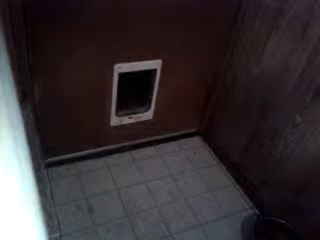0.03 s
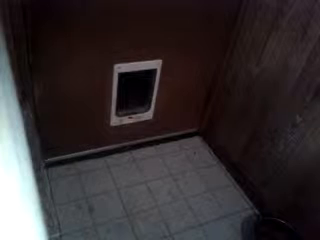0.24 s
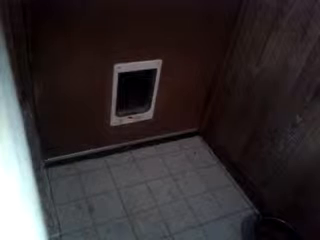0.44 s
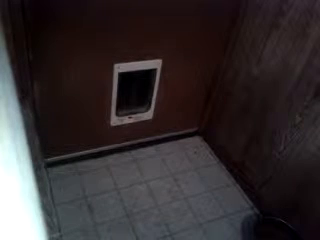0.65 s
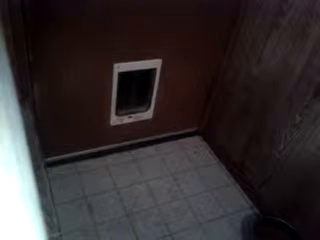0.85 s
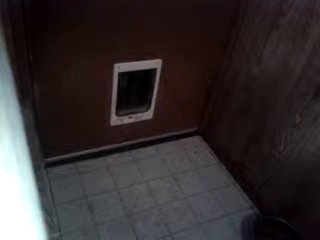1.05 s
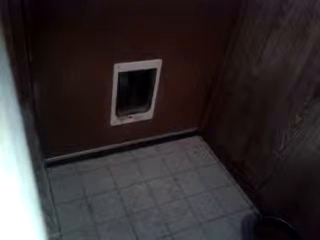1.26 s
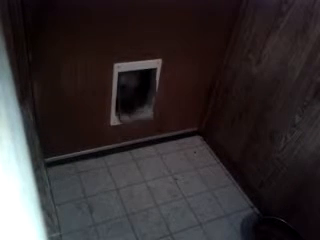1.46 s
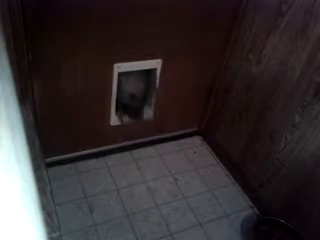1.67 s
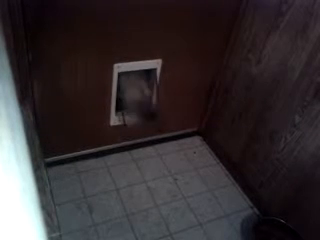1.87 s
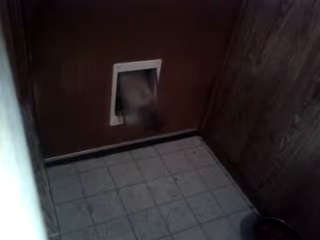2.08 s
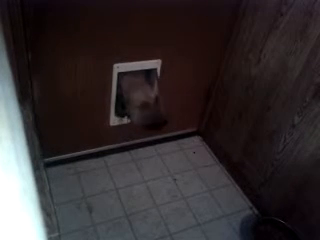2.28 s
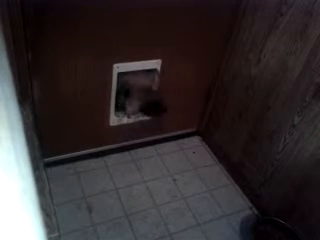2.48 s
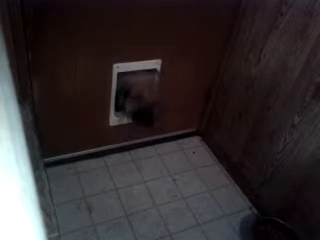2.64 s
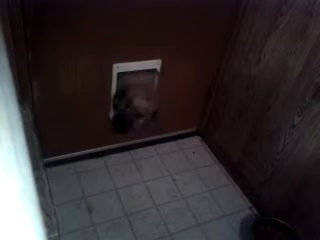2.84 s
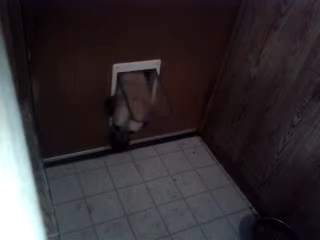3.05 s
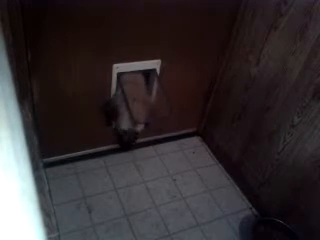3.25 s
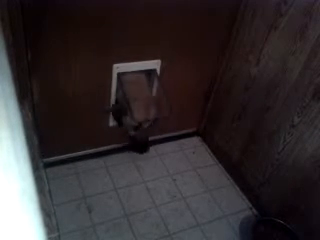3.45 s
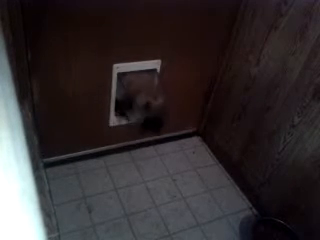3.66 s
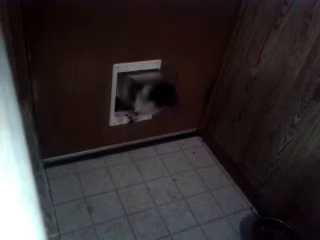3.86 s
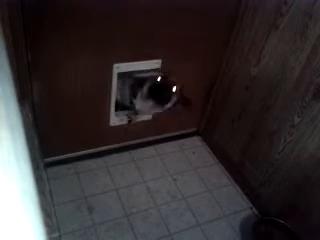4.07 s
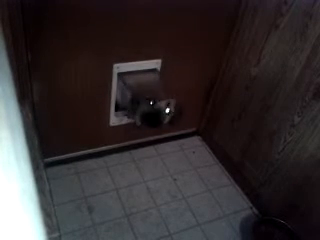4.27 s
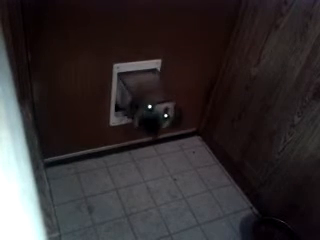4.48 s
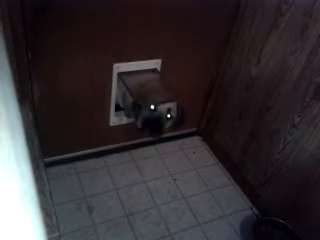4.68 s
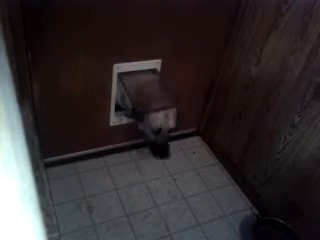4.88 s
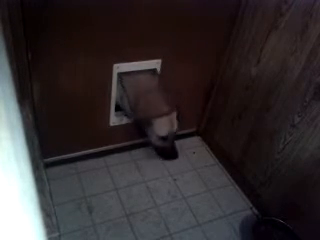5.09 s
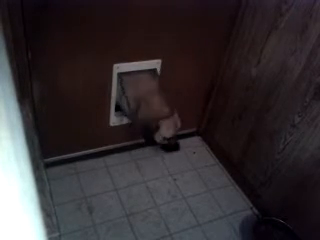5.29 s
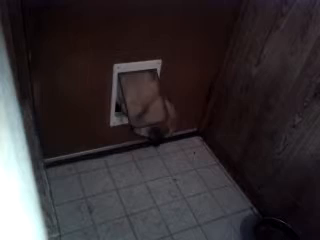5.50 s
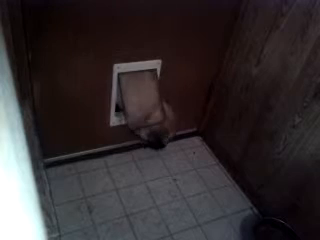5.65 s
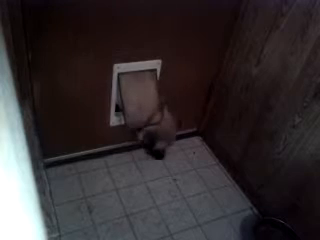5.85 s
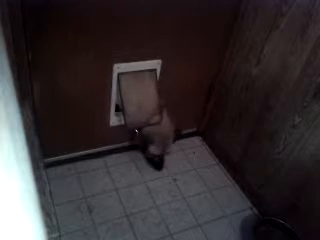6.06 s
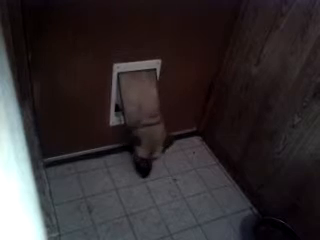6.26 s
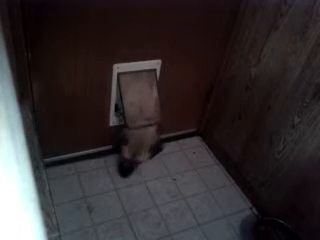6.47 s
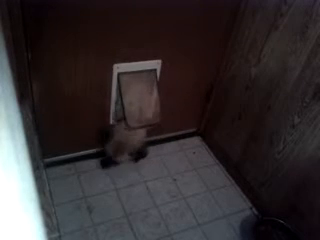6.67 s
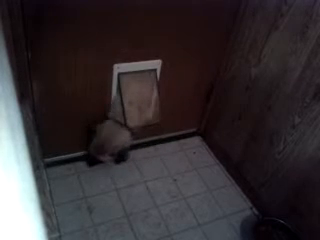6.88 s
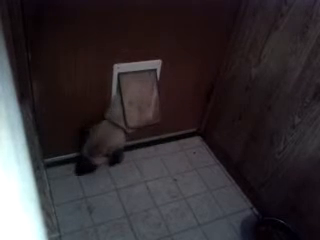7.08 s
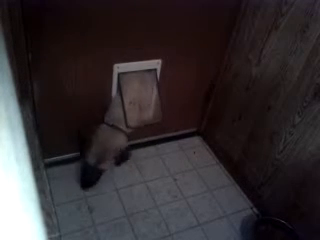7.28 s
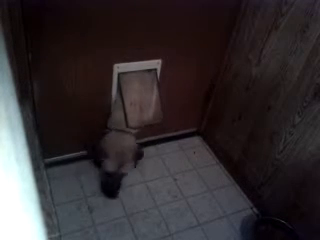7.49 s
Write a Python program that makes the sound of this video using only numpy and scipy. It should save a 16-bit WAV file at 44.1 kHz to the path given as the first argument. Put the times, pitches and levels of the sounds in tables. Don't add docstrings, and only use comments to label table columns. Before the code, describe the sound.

A quiet small tiled room: faint low fridge hum, floor rumble and steady microphone hiss, nothing else until a light rub at about 1.3 s. Around 1.5 s a dog pushes a pet flap, giving a quick double knock and rattle on a hollow wooden door. Another cluster of dull thumps comes at 1.9-2.2 s, with a tiny tag chink. From 2.55 to 3.5 s it is dense: heavy boomy knocks, flap clacks, grainy body rubbing. More bumps follow at 3.8 s, a bright little chink at 4.0, and the hardest thump near 4.25. Lesser knocks continue at 4.6-5.3 s, then a thud at 5.7 and a flap slap at 5.9. Sparse scuffs, faint chinks and a bump around 6.9 s lead to a weak final knock near 7.5. Short hard reverberation, phone about two metres away, muffled top end.

```python
import sys
import numpy as np
from scipy import signal
from scipy.fft import rfft, irfft
from scipy.io import wavfile
from scipy.ndimage import uniform_filter1d

SR = 44100
rng = np.random.default_rng(int(sys.argv[2]) if len(sys.argv) > 2 else 0)


def dump_mix(stems):
    frames = np.atleast_2d(stems).T
    limited = np.clip(frames, -1, 1)
    pcm = np.round(limited * 32767).astype(np.int16)
    wavfile.write(sys.argv[1], SR, pcm)


def convert_level_to_amplitude(level_db):
    exponent = np.asarray(level_db, float) / 20
    return 10 ** exponent


N = 332204
T = np.arange(N) / SR


def level(x, db):
    return x * convert_level_to_amplitude(db) / np.sqrt(np.mean(x ** 2))


def band(x, lo_hz, hi_hz, order=2):
    edges_hz = [lo_hz, min(hi_hz, 0.45 * SR)]
    return signal.sosfilt(signal.butter(order, edges_hz, "bandpass", fs=SR, output="sos"), x)


def low(x, top_hz, order):
    return signal.sosfilt(signal.cheby2(order, 70, top_hz, fs=SR, output="sos"), x)


def log_curve(hz, table):
    table_hz, value = np.transpose(table)
    return np.interp(np.log(hz), np.log(table_hz), value)


def walk(rate):
    hold = int(SR / rate)
    steps = np.repeat(rng.standard_normal(N // hold + 1), hold)
    return 1.6 * uniform_filter1d(uniform_filter1d(steps, hold), hold)[:N]


def grit(shape, spread_db):
    size = np.minimum(rng.exponential(size=shape), 4)
    return rng.standard_normal(shape) * convert_level_to_amplitude(spread_db * size)


def ring(modes, t):
    out = 0
    for k, (hz, db, t60) in enumerate(modes):
        out = out + (-1) ** k * convert_level_to_amplitude(db - 60 * t / t60) * np.sin(2 * np.pi * hz * t)
    return out


def place(times, rows):
    out = np.zeros(N + rows.shape[1])
    for s, row in zip(times, rows):
        start = int(s * SR)
        out[start:start + len(row)] += row
    return out[:N]


# (frequency [Hz], density [dB per Hz])
AIR_COLOUR = [(20, -5.5), (40, 0.5), (75, -5), (150, -11), (250, -11), (450, -17), (800, -21),
              (1450, -27.5), (2000, -23.5), (2750, -29.5), (6400, -32), (7400, -34.5)]


def air():
    hz = np.maximum(np.fft.rfftfreq(N, 1 / SR), 1)
    spectrum = rfft(rng.standard_normal(N)) * convert_level_to_amplitude(log_curve(hz, AIR_COLOUR))
    return level(irfft(spectrum, N), -58)


# (multiple of the base note [1], level [dB])
HUM_HARMONICS = [(1, -60.5), (2, -69), (3, -77), (4, -63), (5, -79), (6, -78), (7, -74.5), (10, -79.5)]
# (time [s], level [dB])
FLOOR_RUMBLE = [(0.0, -50), (0.04, -51), (0.4, -54.5), (2.2, -48), (2.35, -63), (3.0, -45), (3.06, -64),
                (3.29, -49.5), (3.77, -54.5), (3.92, -47.5), (4.17, -56), (4.4, -44.5), (4.7, -54),
                (5.51, -53.5), (5.64, -44.5), (5.73, -57.5), (7.42, -53), (7.53, -44)]


def fridge():
    hum_hz = 59.07 * (1 + 0.0023 * walk(2.6))
    turn = 2 * np.pi * np.cumsum(hum_hz) / SR
    hum = 0
    for k, db in HUM_HARMONICS:
        hum = hum + np.sqrt(2) * convert_level_to_amplitude(db + 2.0 * walk(9.3)) * np.sin(k * turn + k * k)
    s, db = np.transpose(FLOOR_RUMBLE)
    noise = rng.standard_normal((2, N))
    rumble = level(band(noise[0], 47.5, 65.6), -1.2) + level(band(noise[1], 33, 34), -12.0)
    return hum + rumble * convert_level_to_amplitude(np.interp(T, s, db))


# (time [s], chink level [dB], upper mode relative level [dB])
TAG_CHINKS = [(2.2702, -55, -21), (2.597, -54, -11), (2.9752, -54, -8), (3.041, -61.5, -4),
              (4.024, -47, -0.5), (4.0574, -65, -22), (4.0941, -68, -23), (4.506, -68, -8),
              (5.348, -55.5, -5), (5.849, -62.5, -23), (6.476, -56, -31), (7.1227, -56, -15)]
# (frequency [Hz], level [dB], t60 [s])
TAG_MODES = [(6330, 1.5, 0.021), (7180, 3, 0.051), (5890, -12.5, 0.067), (4130, -11.5, 0.013)]


def tag():
    s, db, upper_db = np.transpose(TAG_CHINKS)
    t = T[:SR // 5]
    strikes = rng.standard_normal((len(s), len(t))) * np.exp(-t / 0.008)
    out = 0
    for k, mode in enumerate(TAG_MODES):
        part = signal.fftconvolve(strikes, ring([mode], t)[None], axes=1)[:, :len(t)]
        part = part / np.abs(part).max(axis=1, keepdims=True) * convert_level_to_amplitude(mode[1])
        chink_db = db + (upper_db if k == 1 else 0) - 2.0
        out = out + place(s - 0.001, part * convert_level_to_amplitude(chink_db)[:, None])
    return out


# (time [s], level [dB])
LEAF_JOLTS = [(1.474, -39), (2.099, -42.5), (2.705, -31.5), (2.809, -30.5), (2.961, -47), (3.234, -31),
              (3.767, -45), (4.261, -30.5), (4.608, -48), (4.802, -34.5), (4.99, -40), (5.309, -42.5),
              (5.75, -57), (6.18, -57), (6.928, -57), (7.047, -58)]
# (frequency [Hz], level [dB], t60 [s])
LEAF_MODES = [(151.9, -0.5, 0.32), (183.6, -11, 0.29), (150.2, -7.5, 1.4)]


def leaf():
    s, db = np.transpose(LEAF_JOLTS)
    t = T[:SR]
    push_s = 0.0093
    detune = 1 + 0.01 * rng.standard_normal((len(s), 1))
    swell = (1 - np.exp(-t / push_s)) * (1 - t / t[-1])
    return place(s - 0.004, convert_level_to_amplitude(db - 4.5)[:, None] * swell * ring(LEAF_MODES, t * detune))


# (frequency [Hz], level [dB], t60 [s])
DOOR_MODES = [(155.4, 2, 0.13), (183, -9, 0.13), (223.2, -2.5, 0.095), (248.3, -8, 0.099),
              (298.3, -8, 0.12), (352.4, -7.5, 0.17), (450, -2.5, 0.08), (488.4, -0.5, 0.12),
              (575.5, -1.5, 0.065), (609, -3.5, 0.051), (719.4, -12, 0.18), (755.5, -14, 0.16),
              (1000, -7.5, 0.078), (1094, -4.5, 0.071), (1421, -12.5, 0.11), (1696, -17.5, 0.049),
              (1980, -19, 0.045), (2620, -16, 0.058), (3560, -16, .04)]


def door(force, modes_db, spots=1):
    t = T[:SR // 8]
    chance = spots * rng.standard_normal((len(force), len(DOOR_MODES), 2, 1))
    body = 0
    for k, (hz, db, t60) in enumerate(DOOR_MODES):
        spot_hz = hz * (1 + 0.023 * chance[:, k, 0])
        spot_db = db + 4.06 * chance[:, k, 1]
        body = body + (-1) ** k * ring([(spot_hz, spot_db, t60)], t)
    soft_hz = 1510
    force = signal.lfilter([1], [1, -np.exp(-2 * np.pi * soft_hz / SR)], force)
    ringing = signal.fftconvolve(force, body, axes=1)[:, :force.shape[-1]]
    return force + convert_level_to_amplitude(modes_db) * ringing


# (time [s], lean of the body level [dB], slide of fur and flap level [dB])
BODY_RUB = [(1.3, -67, -69.5), (1.59, -46, -57.5), (1.96, -69, -71), (2.11, -49, -53), (2.32, -69, -63),
            (2.58, -48, -53.5), (2.79, -41, -51), (3.54, -54, -52.5), (4.51, -48.5, -65.5),
            (4.65, -56, -71), (5.2, -51, -64), (5.6, -61.5, -64), (5.9, -50, -58), (6.09, -56, -69),
            (6.7, -54, -61.5), (7.01, -50.5, -59.5), (7.25, -55.5, -66.5), (7.53, -55, -63)]


def rub():
    s, lean_db, drag_db = np.transpose(BODY_RUB)
    friction = door(grit((2, N), 3.0), -42.0, spots=0)
    lean_gain = convert_level_to_amplitude(np.interp(T, s, lean_db) + 2.2 * walk(20))
    drag_gain = convert_level_to_amplitude(np.interp(T, s, drag_db) + 2.6 * walk(25))
    lean = level(band(friction[0], 135, 311), -5.6) * lean_gain
    drag = level(band(friction[1], 330, 1415), -6.0) * drag_gain
    return lean + drag


# (time [s], knock level [dB], weight: relative thud [dB], hardness: relative clack [dB])
BODY_THUMPS = [(1.465, -36, 6.5, -7), (1.48, -35, -4, -9.5), (1.54, -38, -2, -12.5),
               (1.658, -43.5, -3.5, -29), (1.933, -38.5, 7.5, -13), (1.956, -34.5, 3, -15.5),
               (2.058, -33.5, 7, -6.5), (2.081, -32, 5, -8), (2.111, -37, 4.5, -15),
               (2.202, -38.5, 8.5, -28), (2.666, -36.5, 4.5, -6.5), (2.71, -30, 1.5, -12),
               (2.775, -37.5, 6.5, -8.5), (2.805, -32, -0.5, -25.5), (2.836, -41.5, 11.5, -21),
               (2.956, -34.5, 4, -4), (3.165, -44.5, 2, -5), (3.232, -59.5, 19, 5), (3.763, -36.5, 7, -5),
               (3.801, -33, 2.5, -8), (4.133, -45, 0, -18), (4.258, -27, 4, -17), (4.276, -50.5, 18.5, -3),
               (4.614, -50, 15, -21), (4.799, -40.5, 3.5, -28), (4.991, -58, 7, -12),
               (5.187, -36, 2.5, -13.5), (5.698, -39.5, 4.5, -26), (6.898, -42.5, 3, -16),
               (7.491, -56.5, 12, -18)]
# (time [s], clack level [dB], relative panel knock [dB], relative edge click [dB])
FLAP_SLAPS = [(2.571, -49, 15, 0), (2.596, -49, 16, -1.5), (2.615, -45, 12.5, -42.5),
              (3.04, -49, 6.5, -7.5), (3.099, -43, -0.5, -9.5), (3.13, -47, 4, -12),
              (3.298, -41.5, 2.5, -1.5), (3.426, -44, 5.5, -8), (3.5, -62, 17, -16), (3.96, -59, 11, -4),
              (4.024, -70.5, -3, 10.5), (4.252, -46, 9.5, -6), (5.92, -48, 5, -16), (6.8, -58, 4, -7),
              (6.84, -64, 9, -1), (7.119, -70.5, 16, 6), (2.2, -63.5, 10, -16), (4.9, -66, 3, -3),
              (5.23, -61, 10, -17), (2.6, -58, 14, -10), (4.645, -67, 14.5, -6), (2.6, -46, 7, -12),
              (2.556, -61.5, 13, -9)]
REBOUND_LOSS = [-12.5, -6, -10.5, -12]


def contacts():
    s, knock, weight, hardness = np.transpose(BODY_THUMPS)
    thump_clack = knock + hardness
    thumps = [s, knock, knock + weight, thump_clack, thump_clack - 18.5]
    s, clack, panel, edge = np.transpose(FLAP_SLAPS)
    slap_knock = clack + panel
    slaps = [s, slap_knock, slap_knock - 16, clack, clack + edge]
    first = np.hstack([thumps, slaps])
    chance = rng.standard_normal((3, first.shape[1]))
    gap_s = 0.036 * np.exp(0.15 * chance[0])
    rebound = np.vstack([first[0] + gap_s, first[1:] + np.array(REBOUND_LOSS)[:, None]])
    rattle_scatter = np.exp(0.15 * chance[1:].ravel())
    return np.hstack([first, rebound]), rattle_scatter


# (low edge [Hz], high edge [Hz], polarity [1])
KNOCK_BANDS = [(320, 820, -1), (165, 320, 1), (820, 2000, 1), (2000, 5000, -1)]


def knocks():
    (s, *band_db), scatter = contacts()
    kind = np.tile(np.repeat([0, 1], [len(BODY_THUMPS), len(FLAP_SLAPS)]), 2)
    rattle_s = np.array([0.014, 0.018])[kind] * scatter
    blow_db = np.array([11, -0.5])[kind] + 0.37 * (band_db[0] + 35.5)
    t = T[:SR // 5]
    softness_db = -np.minimum(band_db[0] + 36, 0)
    rise_s = np.array([0.005, 0.0028])[kind] * convert_level_to_amplitude(0.4 * softness_db)
    rise = (1 - np.exp(-t / rise_s[:, None])) ** 2
    fade = np.exp(-t / np.clip(rattle_s, 0.002, 0.05)[:, None])
    blow = convert_level_to_amplitude(blow_db)[:, None] * np.exp(-((t - 0.004) / 0.00031) ** 2)
    struck = door(grit((len(s), len(t)), 3.96) * rise * fade + blow, -36.0)
    out = 0
    for (lo_hz, hi_hz, sign), db, gain_db in zip(KNOCK_BANDS, band_db, [-0.5, -4.0, 1.07, -0.3]):
        part = sign * band(struck, lo_hz, hi_hz, order=3)
        crest = np.sqrt(2 * uniform_filter1d(part ** 2, size=220).max(axis=1))
        out = out + place(s - 0.003, part * (convert_level_to_amplitude(db + gain_db) / crest)[:, None])
    return out


# (frequency [Hz], t60 [s])
ROOM_DECAY = [(60, 0.35), (300, 0.31), (800, 0.3), (2000, 0.28), (6000, 0.27)]
# (frequency [Hz], level [dB], t60 [s])
STANDING_WAVES = [(151.36, -3.5, 0.81), (293, -14, 0.51), (490, -24.5, 0.17)]


def room(x, wet_db, boom_db):
    t, tail = T[:SR // 2], 0
    for hz in 70 * 2 ** np.arange(0, 7, 0.5):
        t60 = log_curve(hz, ROOM_DECAY)
        noise = band(rng.standard_normal(len(t)), hz / 1.115, hz * 1.202)
        tail = tail + noise * convert_level_to_amplitude(-60 * t / t60)
    tail = tail * (1 - np.exp(-t / 0.0016))
    tail = tail / np.sqrt(np.sum(tail ** 2)) * convert_level_to_amplitude(wet_db)
    tail = tail + ring(STANDING_WAVES, t) * convert_level_to_amplitude(boom_db)
    return x + signal.fftconvolve(x, tail)[:N]


def scene():
    dog = room(knocks() + rub(), -8.0, -66.0) + leaf()
    chinks = room(tag(), -3.5, -85.0)
    return (dog + chinks + fridge() + air())[None]


def top_cut(x):
    return signal.sosfilt(signal.butter(12, 7940, fs=SR, output="sos"), x)


DULLED = [
    3.287,
    4.241,
]


def record(dry):
    x = low(dry, 7980, order=16)
    near = sum(1.0 * (np.abs(T - s) < 0.009) for s in DULLED)
    duck = uniform_filter1d(near, size=64)
    mix = x + duck * (low(x, 4350, order=6) - x)
    return top_cut(mix)


dry = scene()
out = record(dry)
dump_mix(out)
```